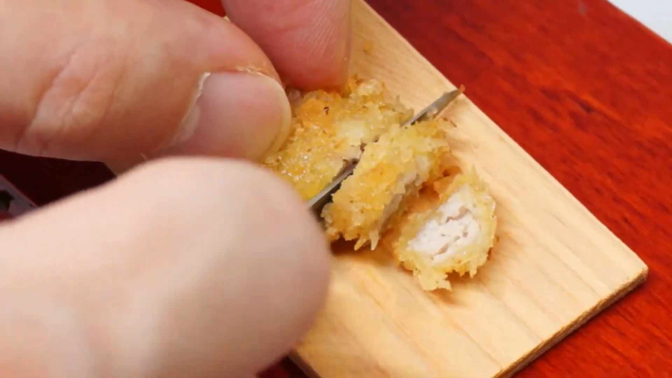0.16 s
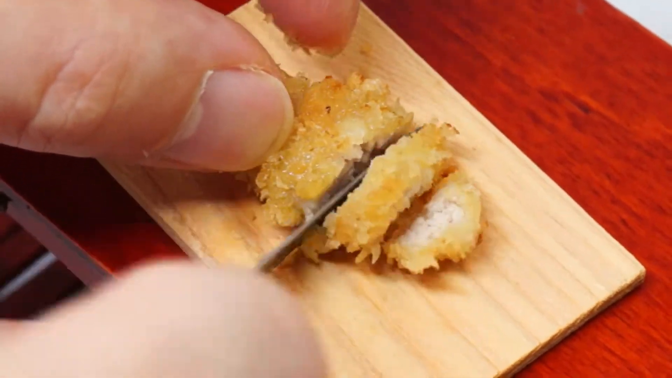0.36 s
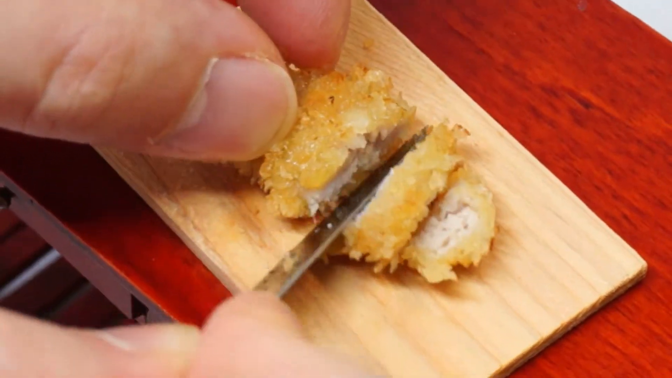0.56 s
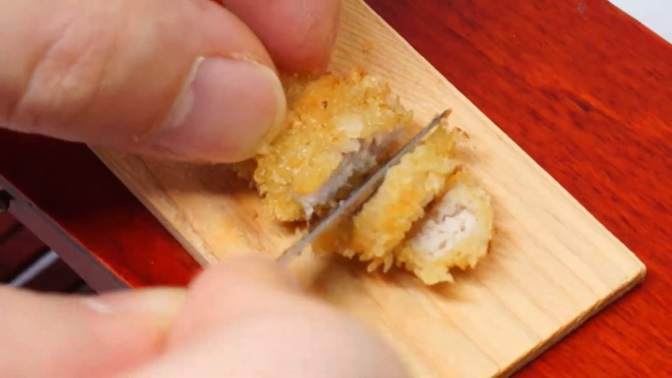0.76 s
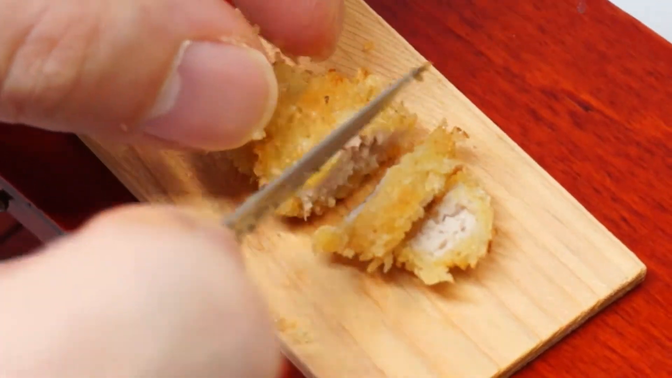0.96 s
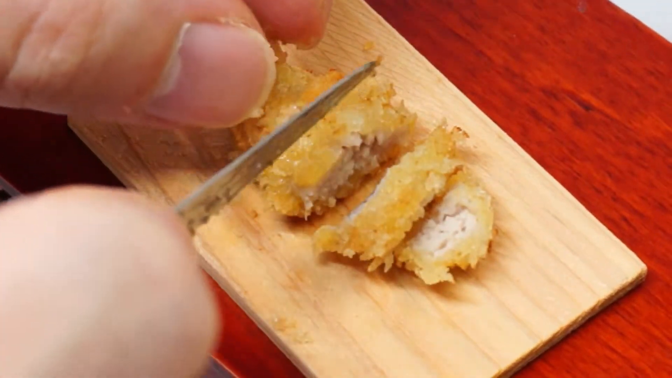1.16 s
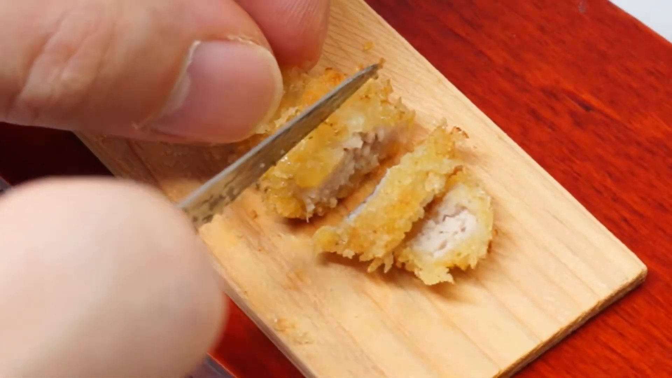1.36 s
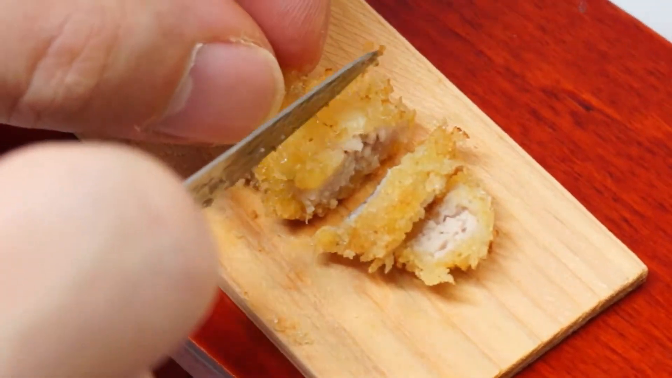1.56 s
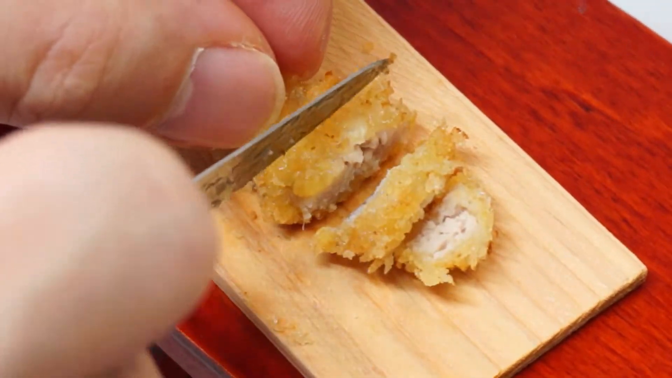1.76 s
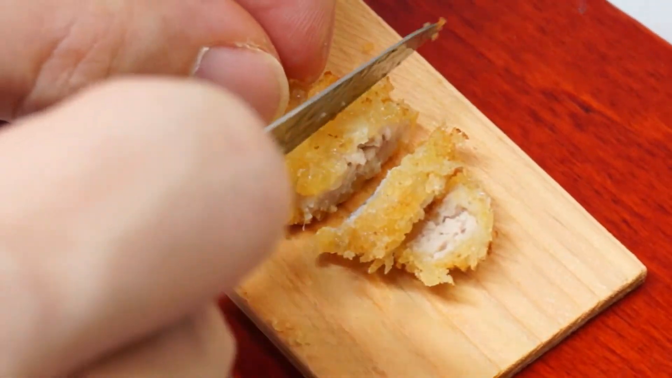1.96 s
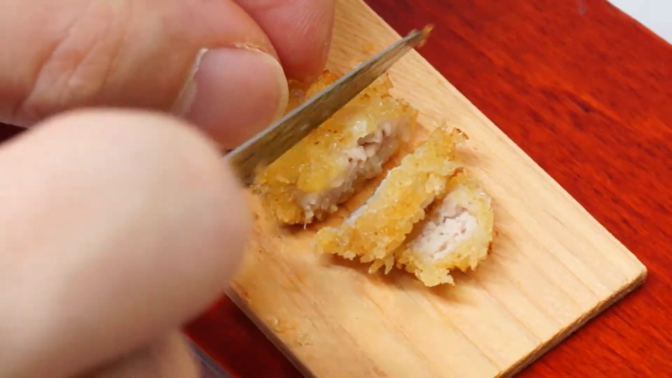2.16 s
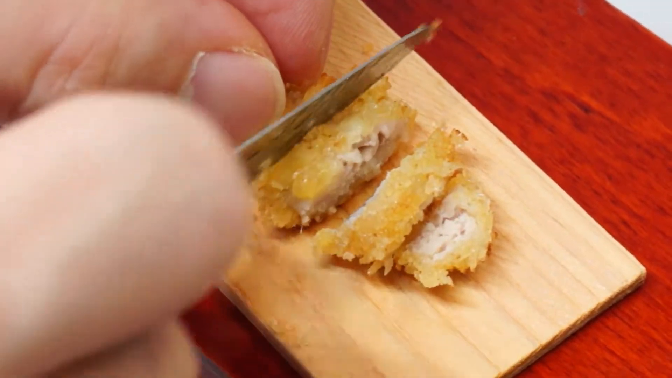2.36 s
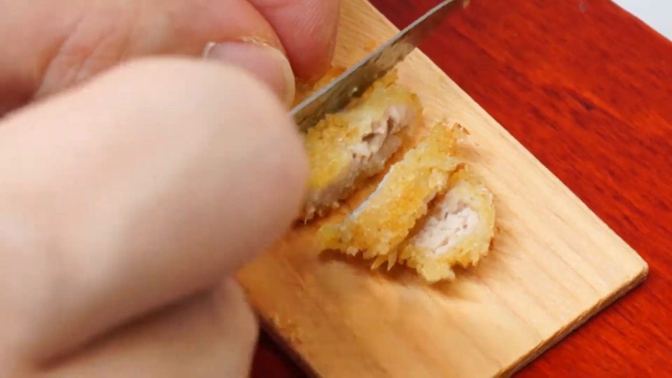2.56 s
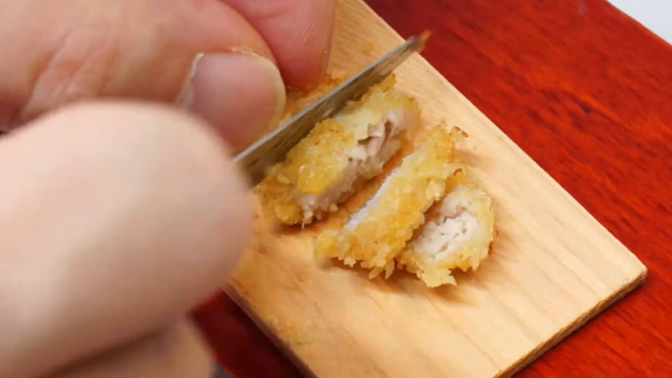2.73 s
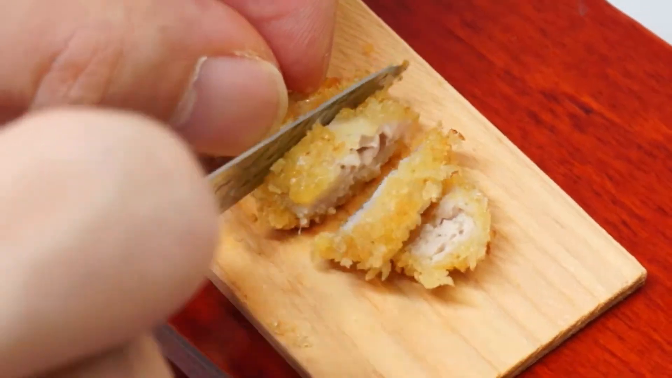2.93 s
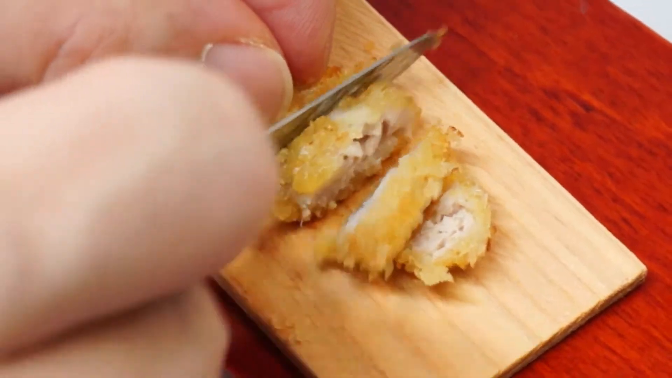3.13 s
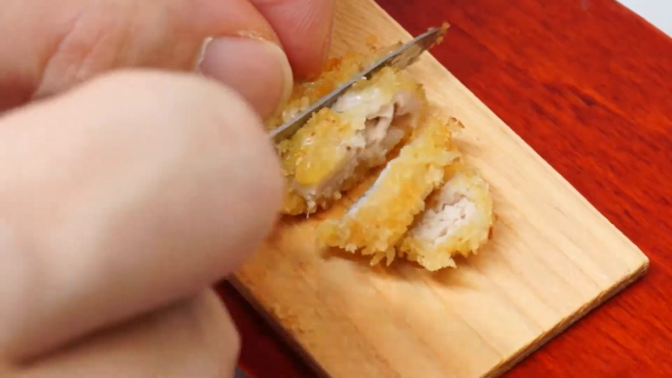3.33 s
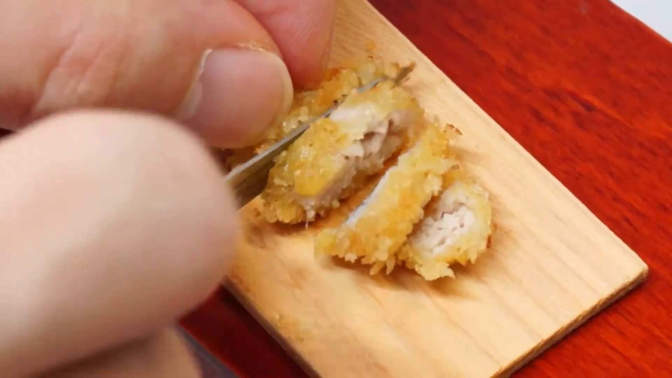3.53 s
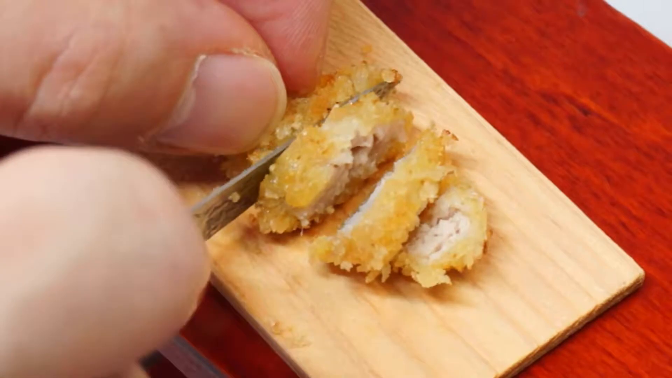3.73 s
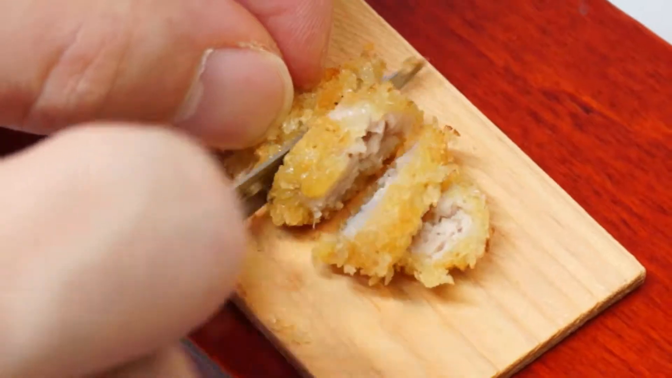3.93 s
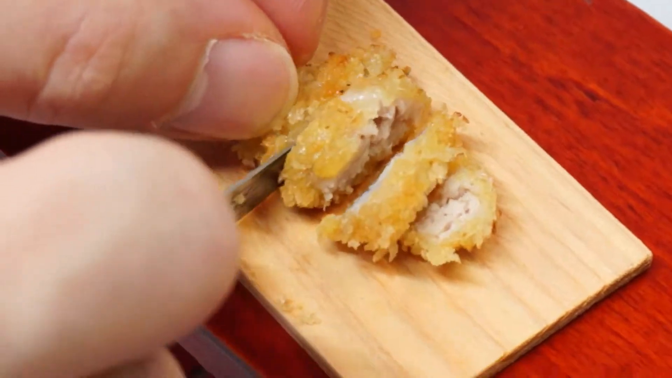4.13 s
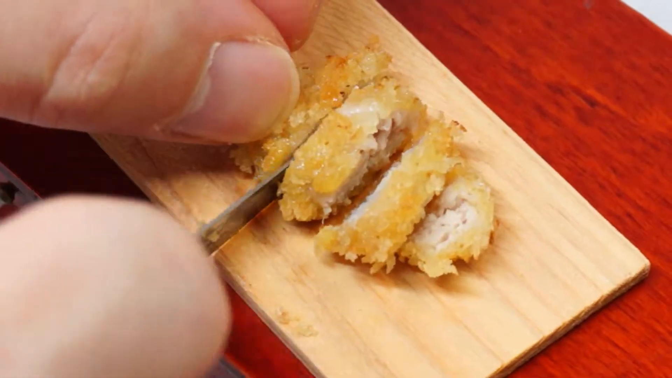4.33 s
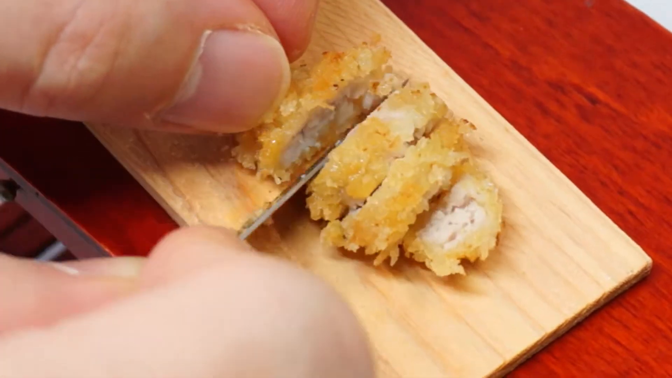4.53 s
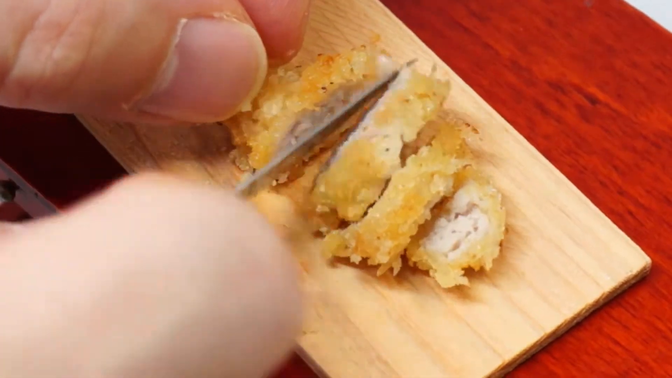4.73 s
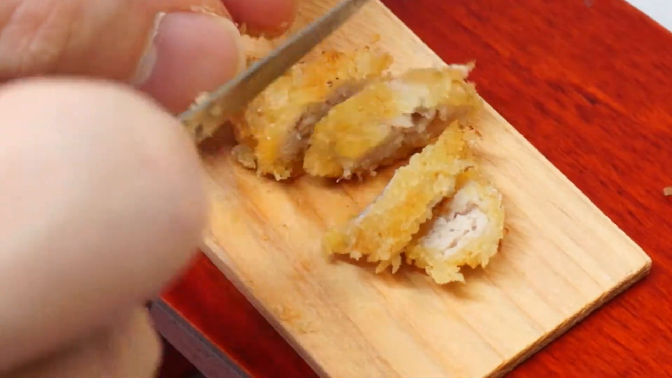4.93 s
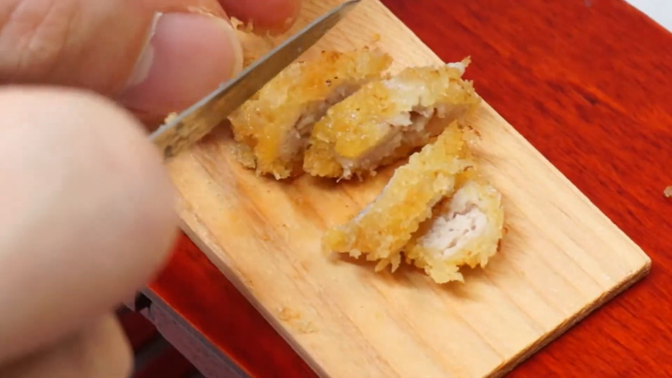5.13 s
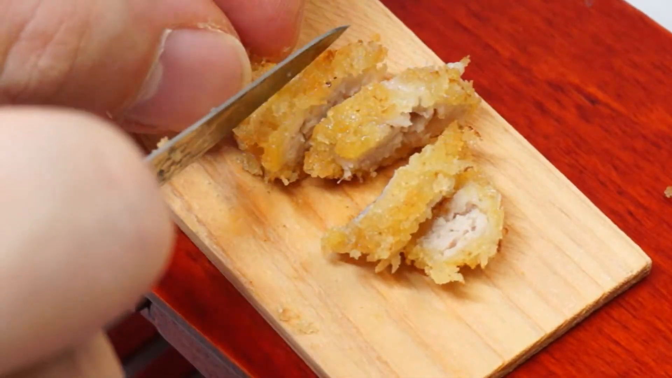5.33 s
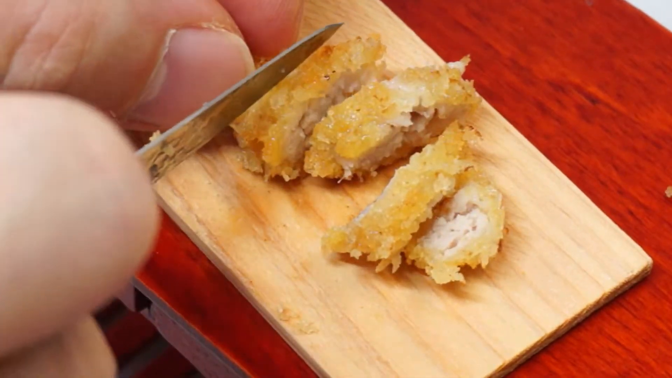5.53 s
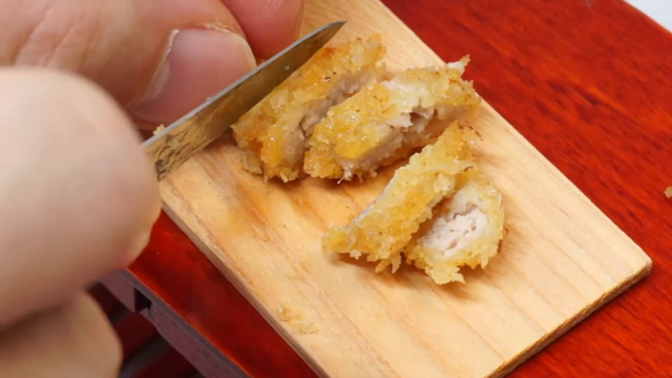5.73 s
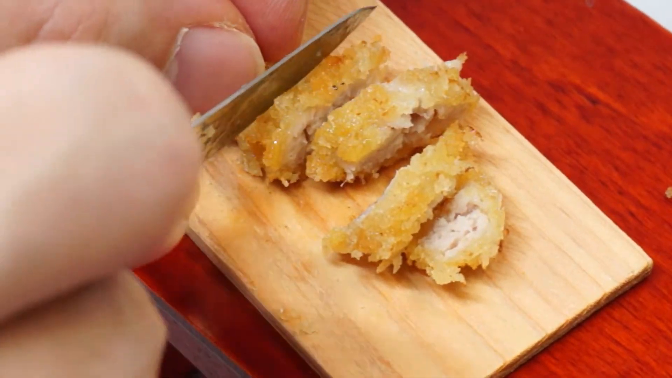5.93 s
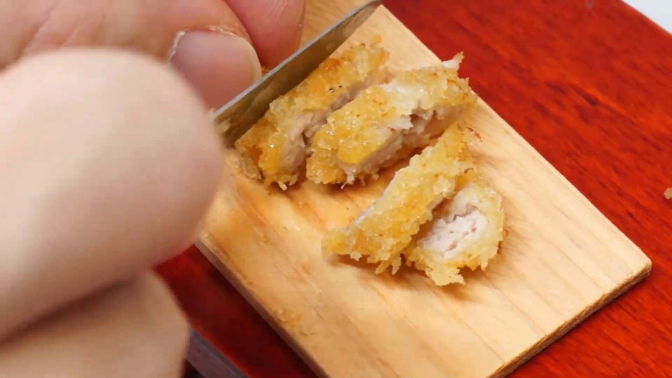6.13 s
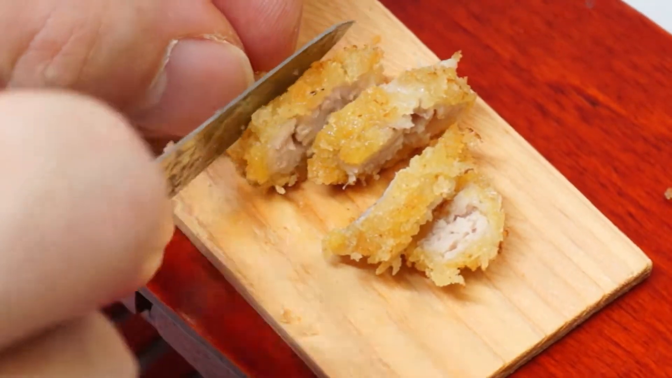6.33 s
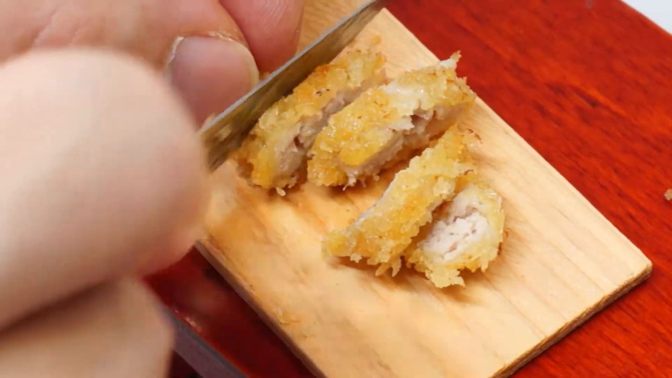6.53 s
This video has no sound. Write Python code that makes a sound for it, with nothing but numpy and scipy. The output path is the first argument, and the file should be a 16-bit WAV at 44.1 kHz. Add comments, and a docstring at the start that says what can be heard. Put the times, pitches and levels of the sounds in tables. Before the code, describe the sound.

A small blade saws through a brittle fried crust with crisp snaps and crumbly crackle, knocking a wooden board over a faint steady hum.

```python
"""A crisp crust snaps and crunches under a small sawing knife: decaying noise bursts and a crackle of crumbs.
Knocks excite the decaying modes of a wooden board and of the table that carries the microphone,
hands rumble the table as shaped noise, and loose pieces ring briefly at one pitch.
Behind them a machine hums and whines as wavering sines, and filtered noise gives the quiet room's hiss."""
import sys
import numpy as np
from scipy import signal
from scipy.fft import rfft, irfft
from scipy.io import wavfile
from scipy.ndimage import uniform_filter1d

SR = 44100
rng = np.random.default_rng(int(sys.argv[2]) if len(sys.argv) > 2 else 0)


def volts_from_decibels(level):
    """Turn decibel levels (scalar or array-like) into linear amplitude factors."""
    exponent = np.asarray(level, float) / 20
    return 10 ** exponent


def digitize_waveform(pressure):
    """Quantize a signal to 16-bit integers and store it at the path in sys.argv[1].

    Rows of a 2-D input are taken as channels; values are limited to [-1, 1].
    """
    field = np.atleast_2d(pressure).T
    bounded = np.clip(field, -1, 1)
    quanta = np.round(bounded * 32767).astype(np.int16)
    wavfile.write(sys.argv[1], SR, quanta)


N = 290178  # length [samples]

# stereo spread of diffuse sound: (frequency [Hz], side minus mid [dB])
DIFFUSE_SIDE = [(60, -19), (110, -15), (200, -14.5), (380, -7.5), (700, -4), (1290, -1.5), (2380, -1),
                (4400, -4.5), (8120, -11.5), (15000, -31)]


def curve(table, hz):
    """Spectral envelope: a (Hz, dB) table interpolated along a log-frequency axis."""
    f, db = np.transpose(table)
    return np.interp(np.log(np.maximum(hz, 1)), np.log(f), db)


def colour(x, db_at, size=1024):
    """Minimum-phase filtering: folding the cepstrum makes the wanted gain causal."""
    cepstrum = irfft(db_at(np.fft.rfftfreq(size, 1 / SR)) * np.log(10) / 20)
    cepstrum[1:size // 2] *= 2
    cepstrum[size // 2 + 1:] = 0
    impulse_response = irfft(np.exp(rfft(cepstrum)))
    return signal.oaconvolve(x, impulse_response)[:N]


def ring(x, hz, t60):
    """Modal resonance: a two-pole filter rings as one exponentially decaying sine."""
    radius = np.exp(-np.log(1000) / (t60 * SR))
    angle = 2 * np.pi * hz / SR
    return signal.lfilter([0, np.sin(angle)], [1, -2 * radius * np.cos(angle), radius ** 2], x)


def unit(x):
    """Normalisation to an rms of 1."""
    return x / np.sqrt(np.mean(x ** 2))


def add(out, s, sound):
    """Superposition: mixes a short sound in at time s [s]."""
    i = int(s * SR)
    out[i:i + len(sound)] += sound[:len(out) - i]


def stereo(mid, side):
    """Sum and difference: left and right from mid and side."""
    return np.array([mid + side, mid - side])


def walk(rate):
    """Slow random modulation: levels held 1 / rate s and smoothed twice; spread near 1."""
    hold = int(SR / rate)
    steps = np.repeat(rng.standard_normal(N // hold + 1), hold)
    return 1.374 * uniform_filter1d(uniform_filter1d(steps, hold), hold)[:N]


def air():
    """Stationary noise: room and microphone hiss, spectrally shaped and wavering slightly in level."""
    # hiss spectrum: (frequency [Hz], relative level [dB])
    hiss_spectrum = [(15, -30), (30, -15), (150, -4), (330, -6.5), (520, -13), (900, -19.5), (1250, -26),
                     (1680, -27.5), (1980, -31.5), (3230, -33.5), (3600, -26.5), (4130, -33.5),
                     (5000, -39.5), (5280, -27.5), (5600, -35), (15800, -35.5), (16200, -78)]
    hz = np.fft.rfftfreq(N, 1 / SR)
    gain = volts_from_decibels(curve(hiss_spectrum, hz))
    # the mid part above 1 kHz sets the level
    gain *= volts_from_decibels(-64.5) / np.sqrt(np.sum(gain[hz > 1000] ** 2) / len(hz))
    side_gain = gain * volts_from_decibels(curve(DIFFUSE_SIDE, hz))
    mid, side = (irfft(rfft(rng.standard_normal(N)) * g, N) for g in (gain, side_gain))
    return stereo(mid, side) * volts_from_decibels(.4 * walk(3))


def hum():
    """Frequency modulation: machine tones waver in pitch and level, the strongest almost steady in pitch."""
    # centre frequency of each tone: [Hz]
    tone_hz = [54, 142, 199, 301, 400, 441.5, 488, 600, 899.5, 1669, 3482]
    # the same tones: (level [dB], pitch wavering [Hz], side minus mid [dB])
    tones = [(-61, 8.17, -18), (-63, 10.06, -15.5), (-67, 4.87, -7), (-61.5, 4.95, -9), (-63, 1.3, -17),
             (-46.5, 0.15, -14.5), (-79, 1.6, -3), (-70.5, 2.04, -0.5), (-75, 1.35, -43),
             (-75.5, 3.09, -13), (-76, 2.97, -21)]
    out = 0
    for hz, (db, waver_hz, side_db) in zip(tone_hz, tones):
        phase = 2 * np.pi * (np.cumsum(hz + waver_hz * walk(20)) / SR + rng.random())
        level = np.sqrt(2) * volts_from_decibels(db + 0.53 * walk(24.94))
        out = out + level * stereo(np.sin(phase), volts_from_decibels(side_db) * np.sin(phase + 1.6))
    return out


def room(x, wet_db, t60):
    """Diffuse reverberation: convolution with decaying noise, partly unlike in the two channels."""
    t = np.arange(int(.4 * SR)) / SR
    decay = np.exp(-np.log(1000) * t / t60) * (t > .003)
    tails = rng.standard_normal((2, len(t))) * decay
    tails /= np.sqrt(np.sum(tails ** 2, axis=1, keepdims=True))
    mid, side = (signal.oaconvolve(x, tail)[:N] for tail in tails)
    return volts_from_decibels(wet_db) * stereo(mid, colour(side, lambda hz: curve(DIFFUSE_SIDE, hz) + 3))


def sawing():
    """Power addition: deep and bright levels [dB] of patches that give way fast and crumble slower, over rubbing."""
    # rustle of the blade resting and rubbing between crunches: (time [s], level [dB])
    rubbing = [(0, -47), (.2, -58), (.95, -64.5), (1.4, -100), (1.55, -65), (2.15, -66.5), (2.4, -59),
               (3.3, -56), (3.6, -60.5), (4.25, -56), (4.9, -63.5), (5.2, -74), (5.36, -61.5), (5.65, -70),
               (5.85, -60), (6.12, -62), (6.35, -56.5), (6.58, -60.5)]
    # patches of crust giving way: (start [s], hold [s], level [dB], deep minus bright part [dB])
    patches = [(0, 0.0071, -46.5, 1), (0.252, 0.023, -53, 7), (0.355, 0.038, -52, 2.5),
               (2.002, 0.049, -59.5, -5), (2.23, 0.032, -50.5, 1), (2.312, 0.042, -51, 1),
               (2.476, 0.038, -56, 0), (2.557, 0.072, -51.5, 5), (2.69, 0.015, -51, 6),
               (2.725, 0.03, -67, -17), (2.857, 0.03, -47.5, 0), (2.977, 0.0099, -46, 5),
               (3.048, 0.01, -54.5, 10), (3.162, 0.086, -49, 7), (3.407, 0.037, -49, 1),
               (3.67, 0.04, -62, -12), (3.884, 0.022, -53.5, -6), (3.94, 0.01, -41.5, -1),
               (4.011, 0.018, -44.5, 7), (4.068, 0.071, -47, 9), (4.529, 0.014, -44.5, -2.5),
               (5.391, 0.015, -56, 2), (5.702, 0.01, -50.5, 0), (5.922, 0.06, -54.5, 9),
               (6.044, 0.0064, -51.5, 5), (6.212, 0.012, -58.5, 14), (6.374, 0.094, -51, 1),
               (6.494, 0.043, -53, 7.5)]
    rise_db_s, fall_db_s = 2500, 364  # slopes [dB/s]
    t = np.arange(N) / SR

    def halves(deep_db):
        """Power division: factors for the deep and the bright half."""
        return volts_from_decibels(np.array([[deep_db], [-deep_db]]))

    power = volts_from_decibels(2 * np.interp(t, *np.transpose(rubbing))) * halves(2)
    for s, hold_s, db, deep_db in patches:
        rise_db = rise_db_s * np.maximum(s - t, 0)
        fall_db = fall_db_s * np.maximum(t - s - hold_s, 0)
        power = power + volts_from_decibels(2 * (db - rise_db - fall_db)) * halves(deep_db)
    return 10 * np.log10(power)


def knocks(crunch_db):
    """Modal excitation: contact pushes and hand jolts drive the table's modes, sharp ticks the board's."""
    # blade and hands bumping the board: (time [s], level [dB], contact [ms], tick relative to push [dB])
    bumps = [(.031, -23, 4.4, 1.5), (0.2159, -16.5, 4.2, -30), (0.229, -24.5, 4.5, -7),
             (0.247, -28.5, 1.6, -21), (0.281, -15.5, 9, -25), (0.349, -23, 4, -9), (0.4696, -18, 6.2, -19),
             (0.588, -26.5, 1.6, -8), (0.812, -25, 6.7, -13), (1.45, -25, 5.1, -31), (1.581, -21, 4.3, -19),
             (1.892, -26, 6.5, -29), (2.334, -29.5, 4.6, -5), (2.62, -23.5, 3.3, -7), (2.7, -24, 2.7, -8),
             (2.904, -14, 1.2, 1), (2.977, -22, 2.3, -18), (2.983, -34, 1.7, 10.5),
             (3.1741, -15, 0.78, 4.5), (3.2491, -18, 4, -7), (3.4102, -15, 0.85, 6), (3.499, -22, 2, -19),
             (3.506, -33.5, 1.8, 9), (3.6955, -18.5, 0.8, 6.5), (3.765, -20.5, 2.8, -7),
             (3.863, -24, 2.6, -20), (3.954, -20.5, 0.99, 4), (4.0261, -17.5, 3.5, -10),
             (4.1145, -19.5, 4.7, -8), (4.1971, -16, 0.79, 7), (4.741, -40, 0.7, 11.5),
             (5.393, -24.5, 6.1, -19), (5.703, -26, 4.3, -8.5), (5.847, -27, 3.6, -11.5),
             (5.951, -21, 5.9, -16), (6.451, -24, 4.6, -11)]
    # board heard through the air: (frequency [Hz], level [dB], t60 [s], polarity)
    board_modes = [(683, -17.5, 0.014, -1), (882, -14.5, 0.033, 1), (977, -40, 0.15, 1),
                   (1220, -33, 0.03, -1), (1400, -32, 0.05, 1), (1560, -32, 0.036, -1),
                   (1755, -25.5, 0.018, -1), (3610, -27, 0.018, -1)]
    # table under the board, felt by the microphone: (frequency [Hz], level [dB], t60 [s], polarity)
    table_modes = [(132, -13.5, 0.25, 1), (150, -15, 0.2, 1), (193, -8.5, 0.063, 1), (223, -7, 0.034, -1),
                   (310, -20, 0.2, -1), (347, -8.5, 0.04, -1), (382, -18, 0.13, -1), (481, -13.5, 0.1, 1),
                   (541, -24, 0.2, -1), (567, -19.5, 0.16, -1)]
    table_late_s = .0005  # the middle of the push follows the tick by this much
    push, ticks = np.zeros(N), np.zeros((len(board_modes), N))
    # every spot on the board wakes its modes differently
    spots_db = 1.5 * rng.standard_normal((len(bumps), len(board_modes)))
    for (s, db, contact_ms, tick_db), spot_db in zip(bumps, spots_db):
        # a softer contact is a longer push and leaves the upper modes still
        shape = np.hanning(int(contact_ms * SR / 1000) + 3)
        add(push, s + table_late_s - contact_ms / 2000, volts_from_decibels(db) * shape / shape.sum())
        ticks[:, int(s * SR)] += volts_from_decibels(db + tick_db + spot_db)
    # the harder the sawing, the more the hands jolt the table
    jolt_db = 0.45 * crunch_db - 48.5 + 4.5 * walk(30)
    push += volts_from_decibels(jolt_db) * rng.standard_normal(N)
    table = sum(sign * volts_from_decibels(db) * ring(push, hz, t60) for hz, db, t60, sign in table_modes)
    table = signal.sosfilt(signal.butter(2, 70, "high", fs=SR, output="sos"), table)
    board = sum(sign * volts_from_decibels(db) * ring(tick, hz, t60)
                for tick, (hz, db, t60, sign) in zip(ticks, board_modes))
    return table, board


def ringers():
    """Resonance under friction: a short rough scrape wakes one mode of each loose piece."""
    # pieces scraped or breaking off: (time [s], level [dB], frequency [Hz])
    pieces = [(0.228, -52.5, 1400), (0.362, -56.5, 1360), (2.2246, -48.5, 3260), (2.619, -38, 4500),
              (2.693, -47.5, 4250), (2.891, -46.5, 4540), (2.983, -44.5, 4500), (3.2197, -42.5, 4370),
              (5.7, -49, 5500), (5.846, -47, 5670), (5.956, -47.5, 4130), (6.41, -37, 8050),
              (6.4514, -45, 8650)]
    scrape_cycles, ring_cycles = 6, 25  # decay constant of the scrape and t60 of the ring [periods]
    out = np.zeros(N)
    for (s, db, hz), noise in zip(pieces, rng.standard_normal((len(pieces), 1500))):
        cycles = np.arange(len(noise)) * hz / SR
        scrape = noise * np.exp(-cycles / scrape_cycles)
        sound = ring(scrape, hz, ring_cycles / hz)
        add(out, s, volts_from_decibels(db) * sound / np.sqrt(np.mean(sound[cycles < ring_cycles] ** 2)))
    return out


def splinter(noise, side, hz, slow_s, tail, ring_db, ring_s):
    """Brittle fracture: an impulse, its bounce and decaying splinters, tinted by a short ring; energy 1."""
    burst = tail * noise * np.exp(-np.arange(len(noise)) / SR / slow_s)
    burst[0] = side
    # each break is heard again off the board
    burst[int(.00036 * SR)] += .5 * side
    burst += volts_from_decibels(ring_db) * ring(burst, hz, ring_s)
    return burst / np.sqrt(np.sum(burst ** 2))


def crust(crunch_db):
    """Fracture noise: snaps over a random crackle, in a deep and a bright half; the blade's modes ring along."""
    # clearest single crumbs snapping: (time [s], level [dB], deep minus bright part [dB])
    snaps = [(0.0306, -15, -5.5), (0.28, -34, 1), (0.2841, -31.5, 0), (0.34, -39.5, -3), (0.672, -41, -18),
             (0.707, -37.5, -4), (0.762, -33.5, 1), (1.4442, -40, 1), (1.5316, -35, -2), (1.5772, -38, 5),
             (1.6882, -37.5, 0), (1.8853, -39, -16), (1.8928, -38, -8), (2.0555, -35, 2), (2.101, -28, -13),
             (2.2242, -23.5, 13), (2.2115, -40, 0), (2.218, -38, 3), (2.249, -37, 2), (2.3234, -33, -10),
             (2.3274, -29, -1), (2.3383, -29, -13), (2.361, -35, 1), (2.4825, -33, -2), (2.493, -30, -5),
             (2.516, -39, -15), (2.569, -44, -10), (2.5806, -27.5, -4), (2.6199, -29.5, -10),
             (2.629, -35, -6), (2.688, -46, -5), (2.693, -41, 7), (2.703, -41, -8), (2.8807, -34, -22),
             (2.889, -35, 1), (2.923, -37, -15), (2.9617, -31, 2), (2.9684, -33, 3), (2.981, -32, -13),
             (2.9842, -32.5, -3), (3.059, -36, -5), (3.065, -28, 12), (3.195, -16, -0.5), (3.2193, -36, 8),
             (3.292, -37, -2), (3.3963, -35, -21), (3.4186, -26, 1), (3.4426, -25.5, 0),
             (3.4509, -25.5, -9), (3.501, -36.5, -22), (3.8325, -36.5, -10), (3.8884, -33.5, -16),
             (3.904, -41, -8), (3.909, -37, 8), (3.921, -35, 11), (3.925, -38, 0), (3.9486, -27, -22),
             (3.968, -32, 1), (3.9713, -26, -1), (3.982, -25, 7), (4.0125, -22.5, -5), (4.02, -19.5, -0.5),
             (4.054, -37, 0), (4.0738, -21, 4), (4.09, -19.5, 11), (4.0958, -23, 6), (4.1065, -14, 10),
             (4.117, -37, -10), (4.1241, -32, -5), (4.2143, -30, 3), (4.507, -32, -1), (4.5449, -36, 4),
             (4.74, -34, 2), (5.371, -40, 3), (5.3966, -26.5, 3), (5.6148, -41.5, -3), (5.7, -41, -4),
             (5.8446, -37, -16), (5.932, -34.5, -8), (5.9551, -24.5, 2), (6.0547, -32.5, -3),
             (6.1721, -35, -9), (6.2313, -31, -5), (6.2902, -37, -5), (6.327, -33, -7), (6.3807, -28, -4),
             (6.396, -45, -6), (6.4095, -25.5, -2), (6.4501, -27.5, 5), (6.455, -32, -12),
             (6.467, -37, -10), (6.531, -40.5, -13)]
    # blade ringing under the deep half: (frequency [Hz], level [dB], t60 [s])
    blade_modes = [(1724, -38, 0.089), (2448, -26.5, 0.015), (2870, -36, 0.0096), (3543, -24, 0.0082),
                   (4290, -28.5, 0.0096)]
    # spectrum of the breaking crust: (frequency [Hz], gain [dB])
    crust_spectrum = [(1200, -47.5), (2000, -28), (2400, 2.5), (3500, -4), (4600, 1.5), (6500, -0.5),
                      (8500, 4), (13500, 4), (15900, -3), (16700, -48)]
    deep, bright = np.zeros(N), np.zeros(N)
    noises, pitches = rng.standard_normal((len(snaps), 2, 900)), rng.random((len(snaps), 2))
    for (s, db, deep_db), noise, (low, high) in zip(snaps, noises, pitches):
        bright_db = db - 10 * np.log10(1 + volts_from_decibels(2 * deep_db))
        side = np.sign(noise[0, 0])  # polarity of the break
        deep_snap = splinter(noise[0], side, 2900 + 2400 * low, .0025, .15, -22, 0.0041)
        bright_snap = splinter(noise[1], side, 7000 + 6000 * high, .002, .11, -20, 0.0025)
        add(deep, s, volts_from_decibels(bright_db + deep_db + 8.0) * deep_snap)
        add(bright, s, volts_from_decibels(bright_db + 12.5) * bright_snap)

    # small crumbs break in flurries, each with its own size and brightness
    chance = 2600 * volts_from_decibels(3 * walk(60)) / SR
    breaks = (rng.random(N) < chance) * volts_from_decibels(1.3 * rng.exponential(size=N))
    for half, half_db in zip((deep, bright), crunch_db - 3.0):
        sizes = breaks * volts_from_decibels(0.52 * rng.standard_normal(N))
        # each crumb's noise dies away with a time constant of 0.2 ms
        grains = signal.lfilter([1], [1, -np.exp(-1 / (.0002 * SR))], sizes)
        half += volts_from_decibels(half_db) * unit(grains * rng.standard_normal(N))

    def half_gain(slope):
        """Crossover at 6 kHz: a positive slope keeps the lows, a negative one the highs."""
        return lambda hz: curve(crust_spectrum, hz) - 10 * np.log10(1 + (np.maximum(hz, 1) / 6000) ** slope)

    out = colour(deep, half_gain(35.0)) + colour(bright, half_gain(-10.5))
    return out + sum(volts_from_decibels(db) * ring(deep, hz, t60) for hz, db, t60 in blade_modes)


def scene():
    """Direct and reverberant sound: crust, board and table close and through the room, over air and hum."""
    crunch_db = sawing()
    crumbs = crust(crunch_db) + ringers()
    table, board = knocks(crunch_db.mean(axis=0))
    # crumbs break at slightly different places along the blade
    crumb_side = (0.017 + 0.09 * walk(60)) * crumbs
    near = stereo(crumbs, crumb_side) + stereo(board, -.1 * board) + table
    far = room(crumbs, -12, 0.13) + room(board, -8.5, 0.57) + room(table, -8.0, 0.31)
    return near + far + air() + hum()


def roll_off(x):
    """The treble ends steeply here."""
    return signal.sosfilt(signal.butter(12, 16970, fs=SR, output="sos"), x)


def record(dry):
    """Signal chain: the finished mix becomes the stereo output."""
    return roll_off(dry)


dry = scene()
out = record(dry)
digitize_waveform(out)
```